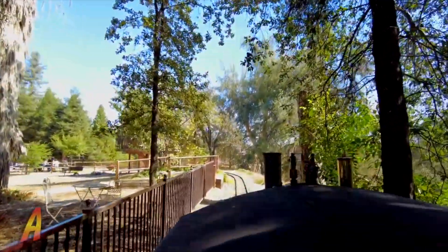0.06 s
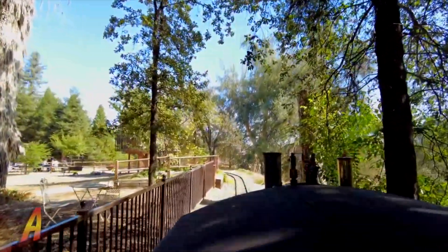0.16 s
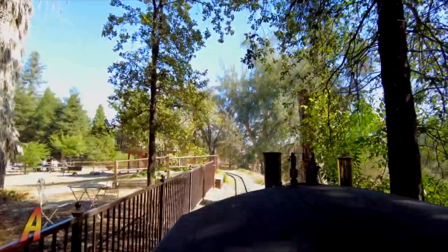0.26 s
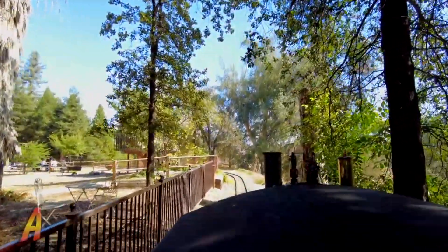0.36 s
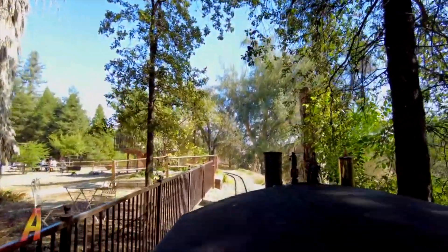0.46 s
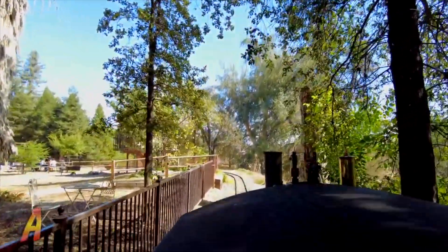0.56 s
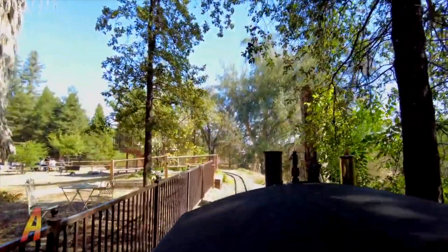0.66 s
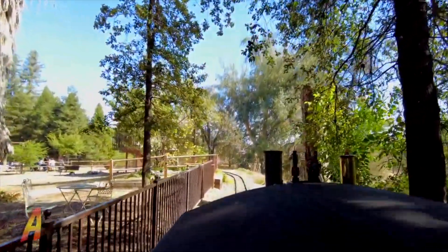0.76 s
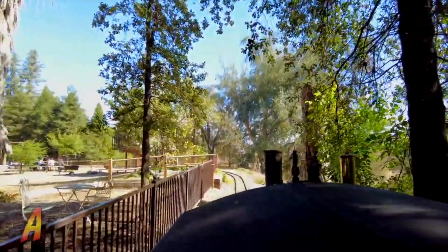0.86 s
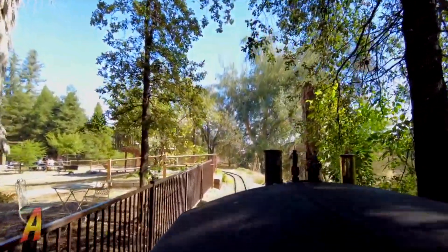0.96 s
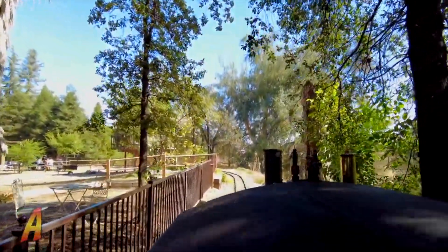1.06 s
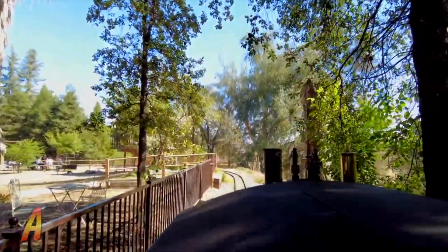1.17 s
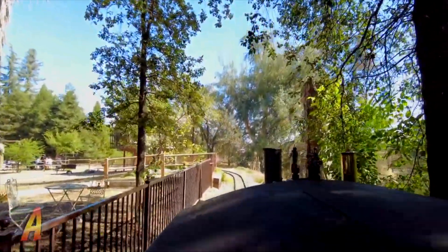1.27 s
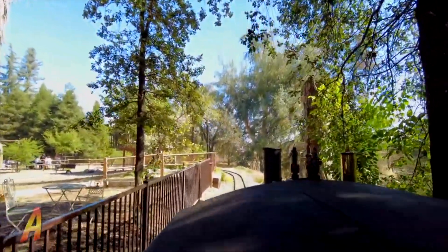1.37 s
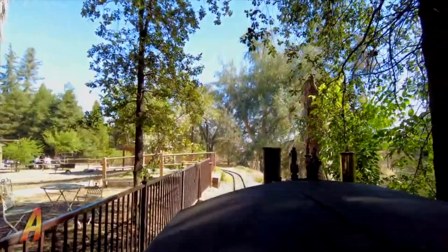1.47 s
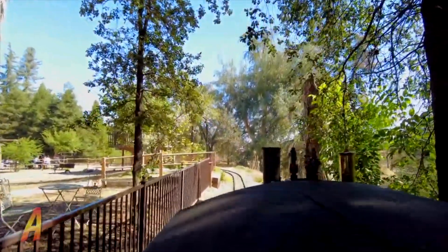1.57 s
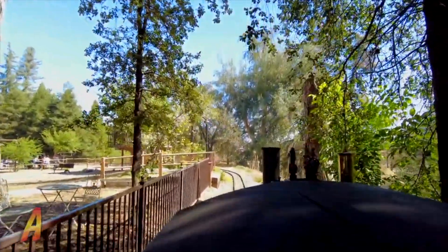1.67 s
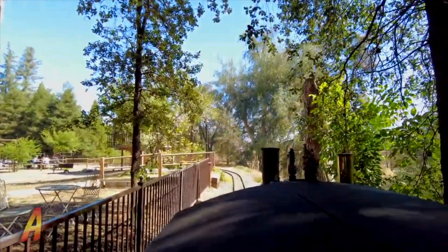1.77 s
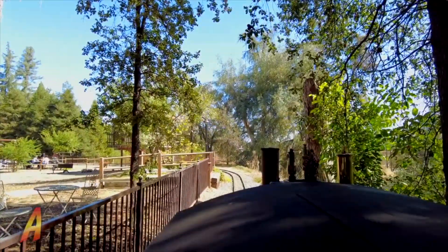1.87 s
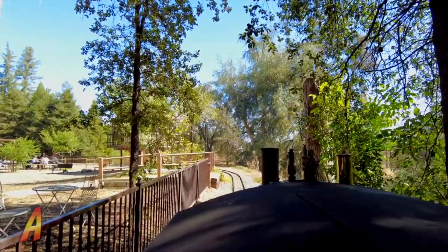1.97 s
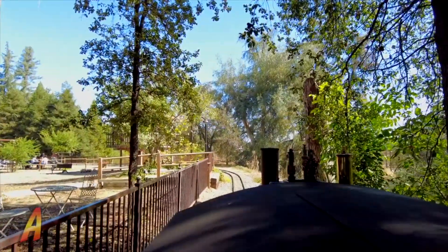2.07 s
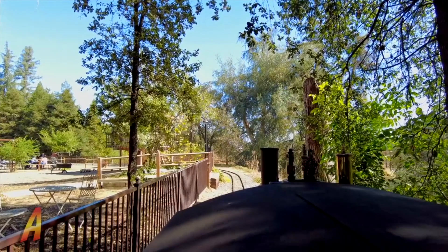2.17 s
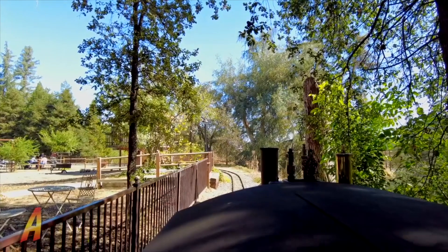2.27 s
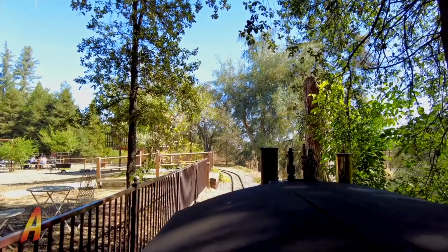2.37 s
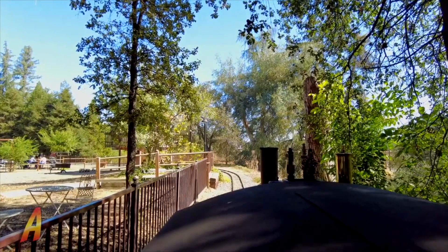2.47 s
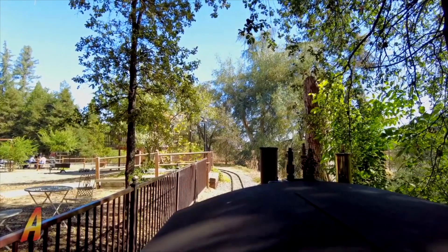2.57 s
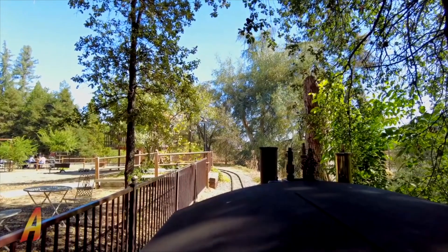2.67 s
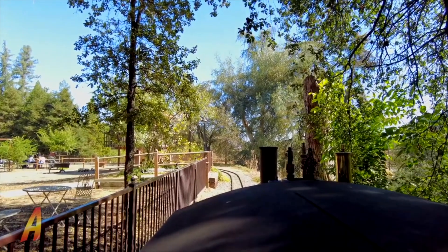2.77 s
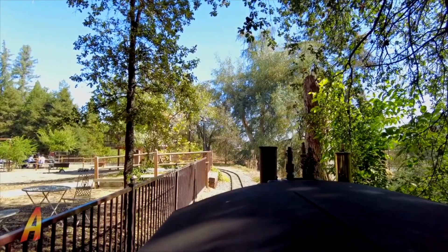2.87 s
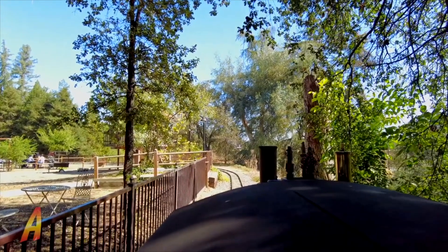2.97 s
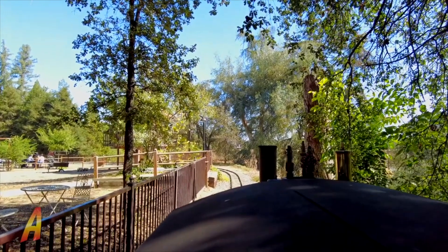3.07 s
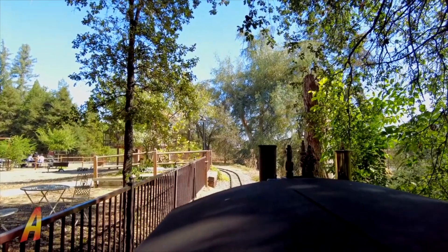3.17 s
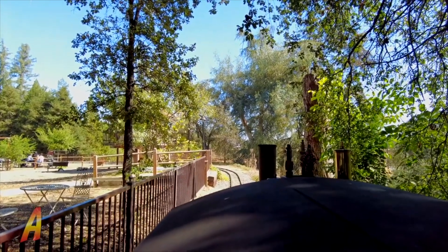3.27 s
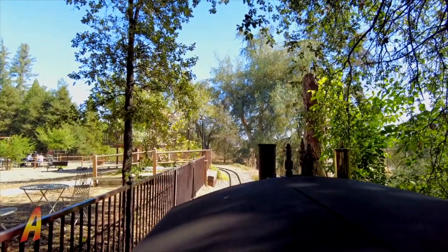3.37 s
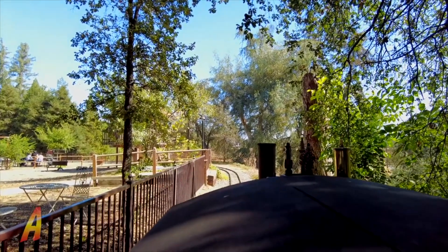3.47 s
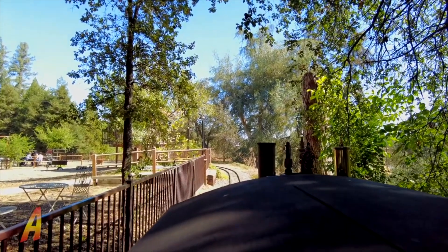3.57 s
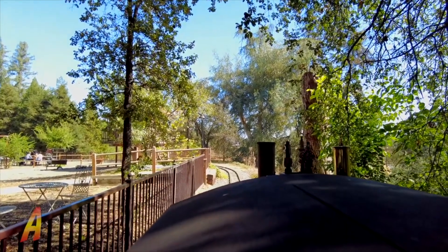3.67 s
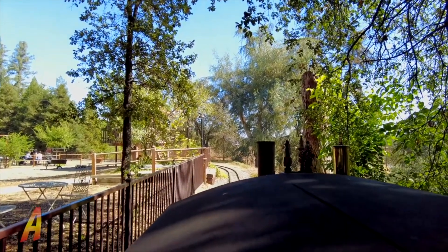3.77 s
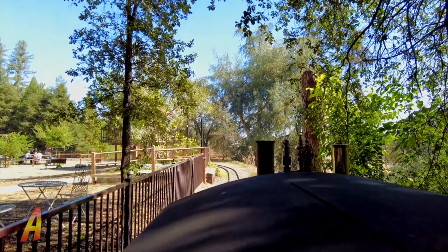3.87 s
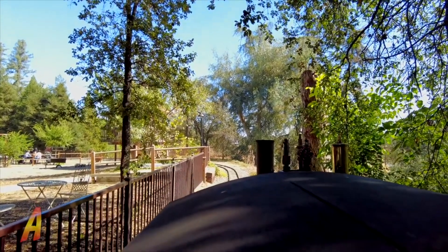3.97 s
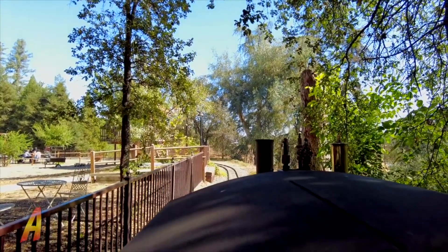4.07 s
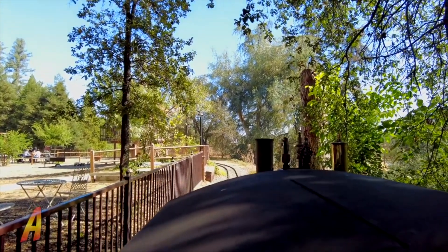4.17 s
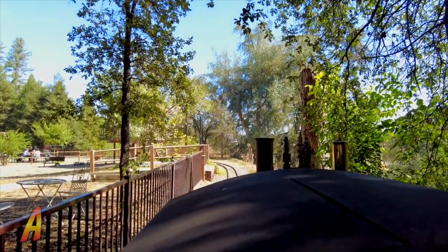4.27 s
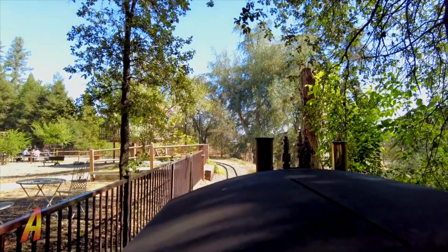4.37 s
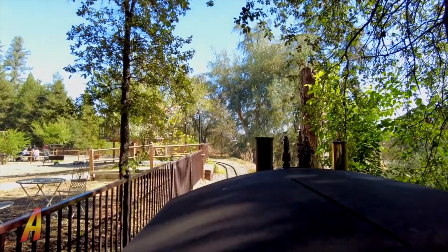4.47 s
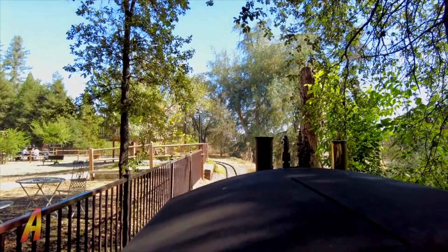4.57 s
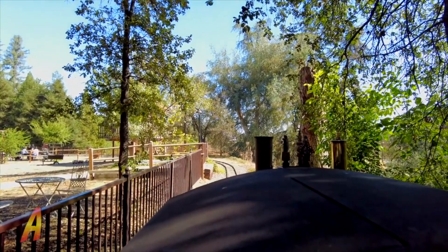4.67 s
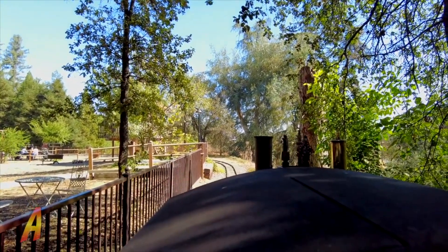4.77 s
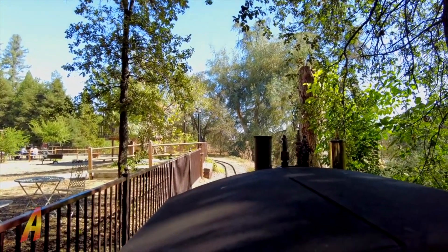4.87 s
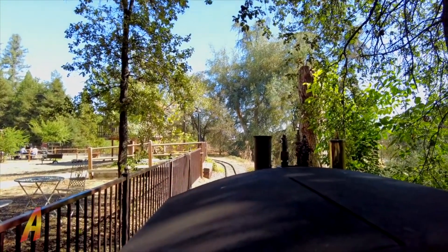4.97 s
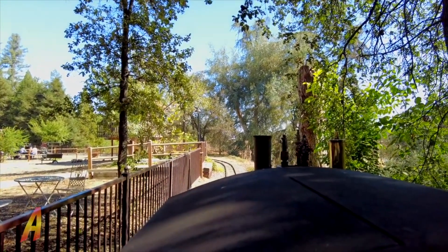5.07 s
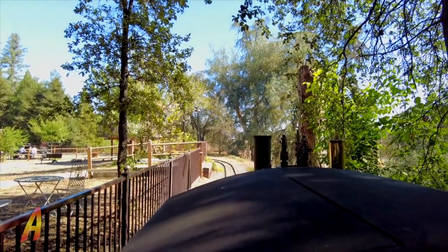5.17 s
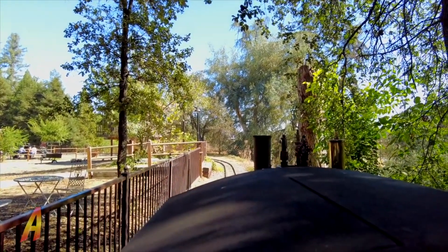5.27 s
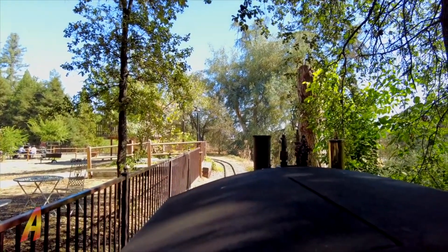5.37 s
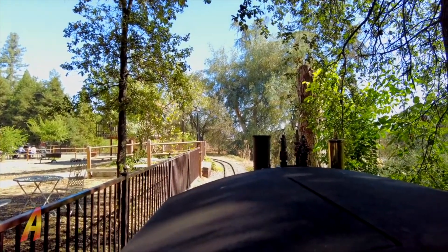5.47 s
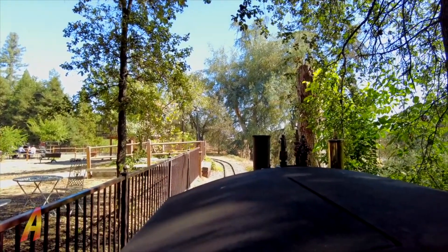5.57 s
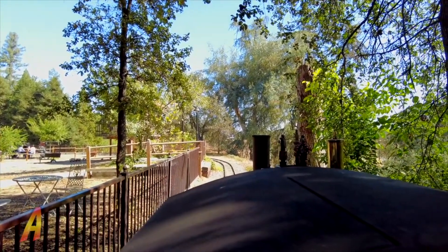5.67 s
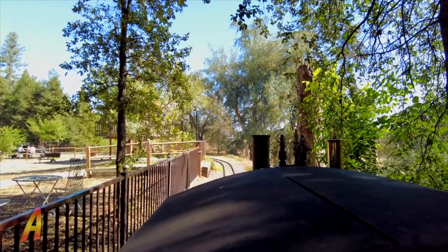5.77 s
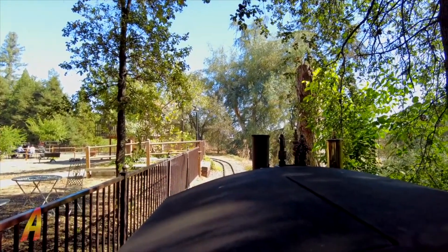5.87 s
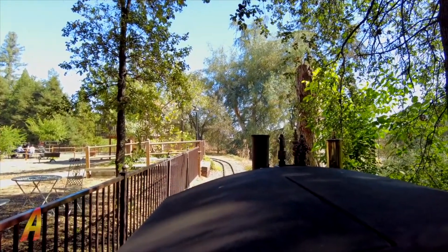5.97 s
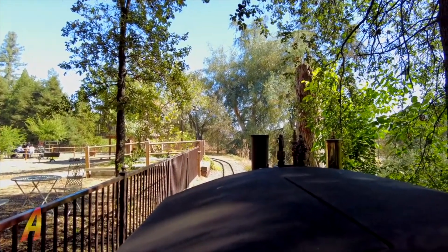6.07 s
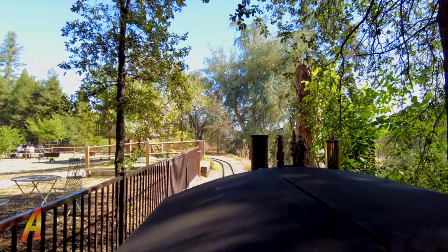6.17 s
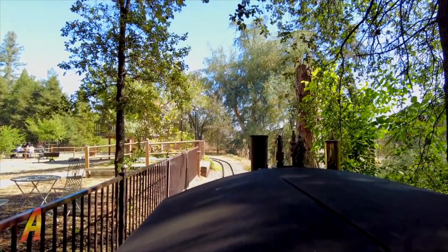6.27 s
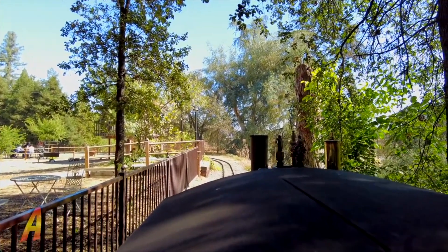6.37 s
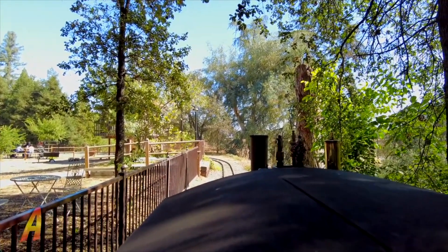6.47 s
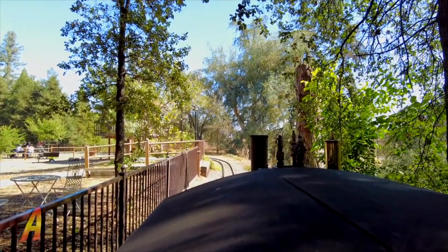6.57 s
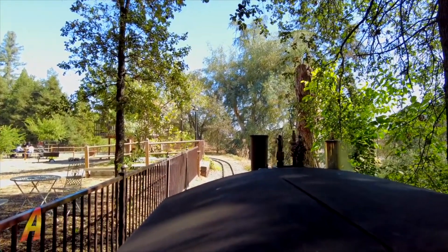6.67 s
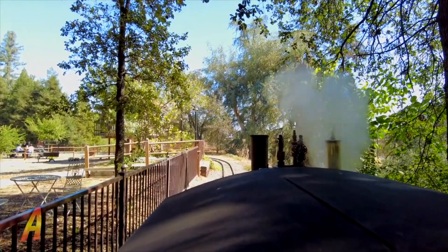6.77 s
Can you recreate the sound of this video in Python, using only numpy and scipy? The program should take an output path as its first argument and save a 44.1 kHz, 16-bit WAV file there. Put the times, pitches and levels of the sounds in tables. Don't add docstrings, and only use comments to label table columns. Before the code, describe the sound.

Close on the cab roof of a small steam locomotive outdoors, an open cylinder cock hisses brightly for nearly one and a half seconds, then shuts to a thin fizz. Irregular low thumps boom through the roof plate, rolling wheels murmur, and couplings clack, most busily after five seconds. At the very end a three-note steam whistle blasts close by, overwhelming everything, and is cut off almost at once.

```python
import sys
import numpy as np
from scipy import signal
from scipy.io import wavfile
from scipy.ndimage import uniform_filter1d

SR = 44100
rng = np.random.default_rng(int(sys.argv[2]) if len(sys.argv) > 2 else 0)


def voltage_ratio(level):
    return 10 ** (np.asarray(level, float) / 20)


def unload_audio(sound):
    columns = np.transpose(np.atleast_2d(sound))
    steps = np.round(np.clip(columns, -1, 1) * 32767)
    wavfile.write(sys.argv[1], SR, steps.astype(np.int16))


N = 300321
T = np.arange(N) / SR
VALVE_S = 6.6

# time in seconds, level in dB.
STEAM = [(0, -28.5), (.85, -28), (.97, -30.5), (1.15, -30.5), (1.39, -36), (1.44, -41.5), (2.65, -39.5),
         (2.9, -44.5), (3.3, -44), (3.5, -42.5), (4.25, -44.5), (4.33, -47.5), (4.5, -50.5), (4.7, -48),
         (4.8, -43), (5.82, -42.5), (5.93, -48), (6.81, -49)]
COCK_SHUTS = (1.33, 1.48)


def evened(x):
    return x / np.sqrt(np.mean(x ** 2) + 1e-20)


def read(points, hz):
    f, value = np.transpose(points)
    return np.interp(np.log(hz + 1), np.log(f + 1), value)


def column(rows, axis):
    return np.interp(T, np.array(rows)[:, 0], np.array(rows)[:, axis])


def add(mix, s, sound):
    at = round(s * SR)
    sound = sound[:, max(-at, 0):]
    part = mix[:, max(at, 0):][:, :sound.shape[1]]
    part += sound[:, :part.shape[1]]


def drift(rate, size):
    low_pass = signal.butter(2, rate, fs=SR, output="sos")
    return evened(signal.sosfiltfilt(low_pass, rng.standard_normal(size)))


def noise(spectrum, peaks=(), patchy_db=1.5, flicker_db=1., size=1024, count=N, side=((1, 0), (2, 0)), turns=0):
    # Hz, likeness of the two ports from 0 to 1.
    same_rows = [(30, 0.98), (100, 1), (300, 0.91), (600, 0.44), (1050, 0.052), (1300, 0.73), (1900, 0.95),
                 (2500, 0.67), (3100, 0.42), (3600, 0.099), (4500, 0.3), (5200, 0.18), (15500, 0.13)]
    # Hz, radians the left port leads.
    lead_rows = [(2500, 0), (3500, 0.4), (5000, -3.5), (8000, -5.5)]
    # Hz, change in dB.
    turn_left = [(2300, 5), (3000, -2), (4500, 1.5), (5500, -4.5), (6200, -6.5), (7600, -3), (8700, 1),
                 (10000, 0.5)]
    turn_right = [(2300, 4), (3400, -1), (4200, -4.5), (4800, -2.5), (5400, 5.5), (5900, 0.5), (6700, 3),
                  (7900, -4.5), (9300, 0.5)]
    turn_s = (0.49, 0.79)
    frames, hz = 4 * count // size + 5, np.fft.rfftfreq(size, 1 / SR)
    a, b, c, d, patches = rng.standard_normal((frames, len(hz), 5)).T
    patches = uniform_filter1d(patches, size=8, axis=0)
    patches = evened(uniform_filter1d(patches, size=12, axis=1))
    flicker = evened(uniform_filter1d(rng.standard_normal(frames), size=4))

    colour = voltage_ratio(read(spectrum, hz)) * (hz >= spectrum[0][0]) * (hz <= spectrum[-1][0])
    for f, width, db in peaks:
        colour = colour * voltage_ratio(db / (1 + (2 * (hz - f) / width) ** 2))

    same = np.clip(read(same_rows, hz), 0, 1)[:, None]
    left = a + 1j * b
    right = same * left * np.exp(-1j * read(lead_rows, hz))[:, None]
    right = right + np.sqrt(1 - same ** 2) * (c + 1j * d)
    z = np.array([left, right]) * colour[:, None] * voltage_ratio(patchy_db * patches + flicker_db * flicker)

    turned = turns * np.interp(np.arange(frames) * size / 4 / SR, turn_s, [0, 1])
    turn_db = np.array([read(turn_left, hz), read(turn_right, hz)])
    lean_db = np.array([[.5], [-.5]]) * read(side, hz)
    z = z * voltage_ratio(lean_db[..., None] + turn_db[..., None] * turned)
    out = signal.istft(z, nperseg=size, noverlap=3 * size // 4)[1][:, :count]
    return out / np.std(out.mean(0))


def roof():
    # second of the peak, peak in dB, half length in ms.
    jolts = [(.82, -22.5, 9.8), (1.29, -21, 7.8), (1.377, -23, 16), (1.412, -18.5, 3.5),
             (1.447, -17.5, 5.6), (1.527, -24.5, 7.2), (1.681, -20, 14.7), (1.975, -23.5, 4.8),
             (2.007, -21, 7.4), (2.493, -26, 8.9), (2.676, -19.5, 6.7), (2.84, -15.5, 6.3),
             (3.661, -15.5, 10.8), (4.01, -23.5, 10), (4.105, -23.5, 8.4), (4.186, -20.5, 8.8),
             (4.307, -22, 5.3), (4.867, -18, 13), (4.906, -22.5, 9.7), (5.0, -22.5, 28), (5.137, -22, 6.4),
             (5.209, -16, 8), (5.251, -18, 4.1), (5.758, -24, 5.7), (5.791, -16, 10.2), (5.984, -16, 8.9),
             (6.199, -26, 8), (6.227, -24.5, 7.7), (6.32, -23, 9.3), (6.503, -24, 8.9)]
    # second of the peak,
    # peak in dB.
    shudders = [(0.012, -27), (.259, -30.5), (.308, -27.5), (.908, -25.5), (1.483, -26.5), (2.263, -31.5),
                (2.386, -28.5), (2.448, -28.5), (2.722, -23.5), (2.792, -27), (2.925, -31), (3.116, -29),
                (3.367, -27), (3.483, -29.5), (4.053, -26), (4.378, -30), (4.45, -30.5), (4.485, -25),
                (4.528, -28), (4.83, -27), (5.167, -27), (5.296, -26), (5.404, -31.5), (5.444, -28.5),
                (5.543, -24.5), (5.708, -29), (5.831, -29), (5.874, -28), (6.026, -31), (6.66, -29.5),
                (0.103, -36.0), (0.349, -36.3), (0.379, -33.9), (0.424, -40), (0.532, -36), (0.632, -32.5),
               (0.7, -42), (0.86, -33.7), (0.991, -38), (1.067, -37), (1.09, -37), (1.138, -41),
               (1.185, -33.5), (1.243, -36), (1.327, -27.5), (1.567, -33), (1.599, -36), (1.861, -34),
               (1.917, -37), (2.076, -33), (2.116, -35), (2.318, -38), (2.345, -30.0), (2.547, -41),
               (2.628, -40), (2.762, -34.1), (2.874, -34), (3.068, -36.7), (3.325, -31.7), (3.572, -32.5),
               (3.711, -33), (3.752, -34), (3.786, -32.5), (3.86, -31), (4.235, -34.7), (4.273, -34.9),
               (4.343, -39), (4.411, -35), (4.688, -37.9), (4.741, -31.5), (4.934, -34), (4.978, -26),
               (5.041, -29.3), (5.083, -37), (5.312, -32), (5.379, -31), (5.498, -39), (5.518, -34),
               (5.579, -37), (5.61, -32.5), (5.652, -34.8), (5.683, -40), (5.917, -36.8), (5.953, -36.5),
               (6.072, -32), (6.159, -33), (6.266, -39), (6.37, -31.9), (6.414, -35), (6.448, -37.3)]
    light_half_ms = 8.3
    plate_hz, plate_spread = 106.5, 0.085
    out, t = np.zeros((2, N)), np.arange(-2600, 5000) / SR
    rows = jolts + [(s, db, light_half_ms) for s, db in shudders]
    for (s, db, half), (phase, lean, stray) in zip(rows, rng.uniform(-1.06, 1, (len(rows), 3))):
        u, hz = 1000 * t / half, plate_hz * (1 + plate_spread * stray)
        shape = np.where(t < 0, np.exp(-.65 * u ** 2), 1 / np.cosh(1.03 * u))
        port_gap = (0.12 * lean - .03) * np.array([[1], [-1]])
        turn = 2 * np.pi * hz * t + np.pi * phase + port_gap
        wave = shape * np.cos(turn)
        wave += voltage_ratio(-21.5) * shape ** 2 * np.cos(2 * turn)
        wave += voltage_ratio(-21.0) * shape * np.cos(0.45 * turn) * voltage_ratio([[-1.2], [1.2]])
        add(out, s + t[0], voltage_ratio(db) * wave * voltage_ratio([[-.25], [.25]]))
    return out


def whistle():
    # Hz, second of full voice, growth in dB per s, level in dB,
    # radians the left port leads at first, and later.
    pipes = [
        (423.6, 6.677, 1000, -13, -0.9, 1.1),
        (497, 6.692, 1010, -8.5, -0.74, -1.26),
        (592, 6.692, 1560, -8, -0.77, -1.86),
    ]
    # dB of the 2nd, 3rd, 4th and 5th tone relative to the first.
    overtones = [
        (-23, -3, -35, -31),
        (-16, -11, -47, -42),
        (-35, -22.5, -43, -46),
    ]
    # Hz, radians the left port leads.
    overtone_lead = [(850, -1.7), (990, 0), (1190, -1.7), (1270, -0.64), (1490, -0.46), (2500, -0.21)]
    # Hz, dB per Hz.
    breath = [(250, -40), (400, -11), (650, 1), (800, -14), (1100, -20), (1400, -4), (1900, -13),
              (2600, -21), (3300, -28), (4500, -42), (9500, -41), (15700, -40)]
    t = T[T >= VALVE_S]
    out, n = np.zeros((2, len(t))), len(t)
    opening = np.clip((t - 6.65) / 0.0193, 0, 1) ** 2
    pressure = 1 / (1 + np.exp(-(t - 6.696) / .006))
    for (hz, s, growth, db, lead, late_lead), tones in zip(pipes, overtones):
        since_full = np.maximum(t - s, 0)
        voice = opening / np.sqrt(1 + voltage_ratio(np.clip(2 * growth * (s - t), -100, 200)))
        flat = 0.055 * (1 - voice) + .2 * (1 - voice) ** 4
        pitch = hz * (1 - flat + 0.0014 * drift(60, n))
        turn = 2 * np.pi * (np.cumsum(pitch) / SR + rng.random())
        gap = lead + (late_lead - lead) * (1 - np.exp(-since_full / 0.0097))
        out += voltage_ratio(db + .4 * drift(40, n)) * voice * np.cos([turn + gap / 2, turn - gap / 2])
        unsettled = 1 + 2.5 * np.exp(-since_full / 0.013)
        for k, tone_db in enumerate(tones, 2):
            gap = read(overtone_lead, k * hz) + .3 * drift(40, n)
            shaken = k * turn + 0.17 * unsettled * drift(70, n)
            level = voltage_ratio(db + tone_db + 2.0 * drift(50, n)) * np.sqrt(voice) * pressure
            out += level * np.cos([shaken + gap / 2, shaken - gap / 2])
    valve_db = np.interp(t, [6.648, 6.657, 6.68, 6.695, 6.71, 6.74], [-75, -51, -34.5, -28.5, -30, -28.5])
    mouths = [(1270, 140, 6), (1500, 150, 4), (1700, 140, 7.7)]  # (Hz, width Hz, dB)
    out += voltage_ratio(valve_db) * noise(breath, mouths, 2.1, 1.1, size=512, count=n)
    return np.pad(out, ((0, 0), (N - n, 0)))


def steam():
    # Hz, dB per Hz.
    jet_colour = [(1180, -39), (2000, -27), (2180, -26), (3030, -5.5), (3920, -8), (4350, -3.5), (4740, -3),
                  (5630, -2.5), (8010, -11.5), (9360, -14.5), (10000, -13), (12300, -19.5), (13700, -20),
                  (15700, -11.5)]
    leak_colour = [(1180, -38), (2000, -11.5), (2220, -22), (2340, -11.5), (2950, -3), (3590, -5),
                   (4310, -0.5), (5120, -1.5), (7160, -1.5), (9360, -10), (10300, -14.5), (13800, -16),
                   (15000, -16.5), (15700, -13)]
    # Hz, width in Hz, dB (jet: dB per Hz at the top; leaks: dB of rise).
    jet_peaks = [(3030, 200, -8.5), (3430, 60, -8), (4370, 280, -1.5), (5530, 116, -3.5), (6010, 200, -3),
                 (6540, 135, -4), (7870, 530, -7), (9160, 150, -11.5)]
    leak_peaks = [(4370, 180, 4.2), (7230, 170, 2), (14800, 220, 6), (15100, 150, 6)]
    # Hz, left over right in dB.
    jet_side = [(2000, 0), (4000, -.5), (4450, 3), (5100, -1), (6500, -5), (7900, -5), (8700, -2),
                (14000, 0.5), (15500, -5)]
    leak_side = [(3000, -0.5), (4500, -0.2), (5200, -1.5), (7900, -4), (8700, -1), (10500, -2.5),
                 (15500, -0.5)]
    # time in seconds, level in dB.
    seep_level = [(5.2, -70), (5.5, -59), (6.2, -58), (6.4, -55.5), (6.81, -55.5)]
    # Hz, dB per Hz.
    seep_band = [(6000, -25), (6500, -3), (6800, 0), (7100, -5), (7600, -25)]
    jet_share = np.interp(T, COCK_SHUTS, [1, 0])
    rises = [(f, w, np.clip(db - read(jet_colour, f) + 7, 2, 12)) for f, w, db in jet_peaks]
    jet = noise(jet_colour, rises, 2.4, 0.53, side=jet_side, turns=0.81)
    leak = noise(leak_colour, leak_peaks, 1.27, 0.41, side=leak_side)
    mix = np.sqrt(jet_share) * jet + np.sqrt(1 - jet_share) * leak
    late = T[T > seep_level[0][0]]
    seep = noise(seep_band, patchy_db=4.0, flicker_db=1.0, count=len(late), side=leak_side)
    seep = voltage_ratio(np.interp(late, *np.transpose(seep_level))) * seep
    return voltage_ratio(column(STEAM, axis=1) + 0.58) * mix + np.pad(seep, ((0, 0), (N - len(late), 0)))


def clacks():
    # start in seconds, peak in dB, pitch in Hz, left over right in dB, brightness in dB.
    blows = [(0.373, -38.5, 299, 1.1, -3.5), (1.078, -31.5, 289, 1.5, -13), (1.216, -37.5, 250, -.6, -9),
             (1.3, -38, 272, -3, -3), (1.399, -44.5, 354, 2.1, -10), (2.648, -38, 790, -4, -6),
             (3.984, -38.5, 600, -5, 0), (4.006, -26.5, 677, 4.5, -9.5), (4.196, -28.5, 618, 2, -17),
             (4.273, -25.5, 677, -2.5, -11), (4.382, -30, 598, 5, -9), (4.856, -41.5, 286, -4, -21),
             (5.204, -32.5, 288, 4, -19), (5.25, -23, 298, 3.5, -21), (5.334, -34.5, 704, -4, 0),
             (5.402, -37.5, 336, 3, -2), (5.438, -33.5, 256, 6, 2), (5.513, -33.5, 1080, -5, 4),
             (5.55, -35.5, 800, -1, -16), (5.579, -37, 298, -2, -2), (5.683, -33.5, 570, 0, -3),
             (5.751, -35, 247, -2, -4), (5.809, -36, 634, -1, 0), (5.839, -36, 845, -4, 0),
             (4.266, -37, 1350, 0, -8), (4.288, -36, 560, 1, -8)]
    low_ring_s, high_ring_s = 0.041, 0.035
    modes = [(.78, 0.35), (1, 0.96), (1.24, 0.45)]
    cluster = [(1150, -3.0), (1370, 1.5), (1650, -6.5), (2050, -5), (2600, -10)]  # (Hz, dB)
    out, t = np.zeros((2, N)), np.arange(4000) / SR
    for (s, db, hz, pan_db, bright_db), luck in zip(blows, rng.standard_normal((len(blows), 3, 600))):
        blow = (1.0 + luck[2] + .5 * luck[:2]) * np.exp(-t[:600] / 0.00053)
        t60 = (low_ring_s if hz < 500 else high_ring_s) * (1 + 0.19 * luck[2, 20])
        body = sum(g * np.sin(2 * np.pi * k * hz * t) for k, g in modes)
        ring = body * voltage_ratio(-60 * t / t60) * (1 - np.exp(-t * hz / 1.13)) ** 2
        stray = 1 + 0.041 * luck[2, 9]
        bright = sum(voltage_ratio(g - 60 * t / 0.026) * np.sin(2 * np.pi * f * stray * t) for f, g in cluster)
        ring += voltage_ratio(bright_db) * bright * (1 - np.exp(-t / 0.001))
        frame_hum = np.sin(2 * np.pi * 805 * t) + np.sin(2 * np.pi * 650 * t)
        ring += voltage_ratio(-17) * frame_hum * voltage_ratio(-60 * t / 0.16) * (hz > 500)
        hit = signal.fftconvolve(blow, ring[None], axes=1)
        gaps = (260 + 60 * luck[2, -2:]).astype(int).cumsum()
        for gap, share in zip(gaps, (.4, .22)):
            hit[:, gap:] += share * hit[::-1, :-gap]
        add(out, s, voltage_ratio(db) * hit / abs(hit.mean(0)).max() * voltage_ratio([[pan_db / 2], [-pan_db / 2]]))
    return out


def hums():
    # start in seconds, peak in dB, pitch in Hz, length in seconds.
    rubs = [(1.329, -33, 211.5, 0.13), (1.501, -56, 1400, 0.16), (1.93, -51, 465, 0.049),
            (5.198, -47, 1434, 0.05), (5.268, -33, 220, 0.029), (5.338, -46, 1200, 0.037),
            (5.355, -49, 787, .04), (5.405, -45.5, 1100, .07), (5.46, -46, 832, .06), (5.61, -51, 806, 0.1),
            (5.75, -45, 1046, 0.04), (5.88, -49, 797, 0.035), (6.378, -52, 423, 0.1)]
    out = np.zeros((2, N))
    for s, db, hz, length in rubs:
        n = round(length * SR)
        turn = 2 * np.pi * hz * np.arange(n) / SR + 0.6 * drift(48, 9000)[:n]
        add(out, s, voltage_ratio(db) * np.hanning(n) * np.cos([turn, turn + 0.65]))
    return out


def rolling():
    # time in seconds, dB.
    work = [(0, 0.5), (.55, 3), (.87, 4), (1.39, 7.5), (1.52, -2), (1.76, -1), (2.3, -0.5), (2.7, 1),
            (3.13, -6.5), (3.56, -0.8), (3.99, -1), (4.25, 4.5), (4.55, -3.5), (4.8, -0.5), (5.0, 5.5),
            (5.73, 5.5), (5.97, 0.5), (6.66, -1.5)]
    # Hz, dB per Hz.
    boom_colour = [(12, -54), (20, -13), (54, -13), (88, -2.5), (107, 4), (127, -5.5), (168, -15.5),
                   (220, -32), (290, -43), (480, -120)]
    rumble_colour = [(88, -37), (150, -5), (172, -12), (189, -7.5), (409, -17), (534, -26.5), (600, -31),
                     (780, -51), (1320, -120)]
    rattle_colour = [(260, -28), (450, -3.5), (553, -13), (645, 2.5), (715, -9.5), (804, 1), (1130, -8.5),
                     (1320, -7.5), (1810, -5), (2200, -5.5), (2600, -4), (3380, -36), (5720, -120)]
    # Hz, width in Hz, dB.
    frame = [(651.7, 16.6, 0), (804, 39, 2.5), (1280, 120, -16), (1870, 150, -11)]
    # second of the peak, drive in dB, rise and fall in dB per s.
    groans = [
        (1.29, -49, 130, 112),
        (2.705, -38, 260, 240),
        (5.81, -44.5, 304, 124),
    ]
    work_db = column(work, axis=1)
    boom_db = -46 + 0.49 * work_db
    rumble_db = -56 + 1.05 * work_db
    steam_db = np.minimum(column(STEAM, axis=1) + 43.5, 0)
    rattle_db = -55 + 0.71 * work_db + 0.32 * steam_db
    boom = voltage_ratio(boom_db) * noise(boom_colour, patchy_db=2.5, flicker_db=1.5, size=2048)
    rumble = voltage_ratio(rumble_db) * noise(rumble_colour, patchy_db=1.5, flicker_db=3.0)
    rattle = voltage_ratio(rattle_db) * noise(rattle_colour, [(f, w, 3.) for f, w, _ in frame], 1.34, 1.24)
    modes = [(f, w, 23.5 + db) for f, w, db in frame]
    drive = sum(voltage_ratio(db - np.maximum(rise * (s - T), fall * (T - s))) for s, db, rise, fall in groans)
    groan = noise([(300, 2.0), (700, 2.5), (2200, -13.5)], modes, 0.44, 1.7)
    return boom + rumble + rattle + uniform_filter1d(drive, size=1500) * groan


def scene():
    return roof() + whistle() + steam() + clacks() + hums() + rolling()


def starve(x):
    # Hz, threshold under which a band is lost, in standard deviations.
    starved = [(9500, -3), (9750, .4), (10400, .3), (10700, -.7), (12000, -.6), (12800, -.9), (13800, -.4),
               (14400, -.8), (14600, -2.5), (15200, -2.5), (15400, -1.2)]
    edge_hz, lead_in, band = 15740, 506, 12
    padded = np.pad(x, ((0, 0), (lead_in, 0)))
    hz, t, z = signal.stft(padded, SR, nperseg=2048, window="cosine", boundary="odd")
    luck = rng.standard_normal((len(t), len(hz) // band + 1)).T
    broad = uniform_filter1d(uniform_filter1d(luck, size=8, axis=1), size=3, axis=0)
    luck = evened(uniform_filter1d(luck, size=2, axis=1)) + .5 * evened(broad)
    strain = np.interp(t, COCK_SHUTS, [.4, -.25])
    dropped = np.repeat(evened(luck), band, axis=0)[:len(hz)] < read(starved, hz)[:, None] + strain
    dropped &= (hz > starved[0][0])[:, None]

    near = uniform_filter1d(abs(z) ** 2, size=5, axis=1)
    weak_hz = [900, 1000, 2300, 2600, 4400, 4600, 9000, 10000]
    weak_share = np.interp(hz, weak_hz, [0, .3, .3, .15, .15, .36, .42, .72])[:, None]
    faint = near < weak_share * uniform_filter1d(near, size=24, axis=1)
    faint &= ~((hz < 4400)[:, None] & (t > VALVE_S))
    kept = ~dropped & ~faint & (hz < edge_hz)[:, None]
    return signal.istft(z * kept, SR, nperseg=2048, window="cosine")[1][:, lead_in:N + lead_in]


def top_cut(x):
    return signal.sosfilt(signal.butter(12, 17090, fs=SR, output="sos"), x)


def record(dry):
    ceiling = 1.5
    power_db = 10 * np.log10(abs(uniform_filter1d((dry ** 2).mean(0), size=900)) + 1e-12)
    keep = np.exp(-1 / (0.052 * SR))
    cut_db = signal.lfilter([1 - keep], [1, -keep], 0.81 * np.maximum(power_db + 18.0, 0))
    rounded = ceiling * np.tanh(dry / voltage_ratio(cut_db) / ceiling)
    ending = np.minimum((T[-1] - T) / .0015, 1)
    return top_cut(ending * starve(rounded))


dry = scene()
out = record(dry)
unload_audio(out)
```